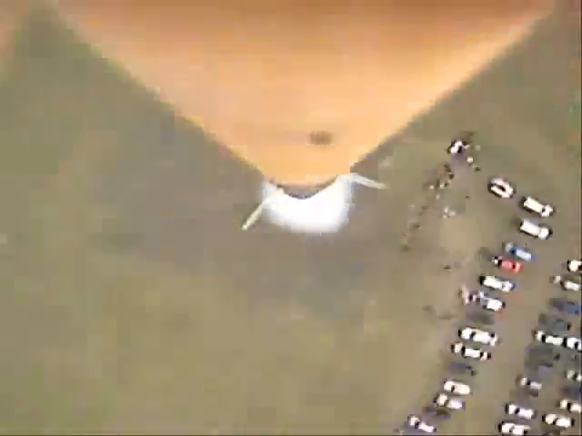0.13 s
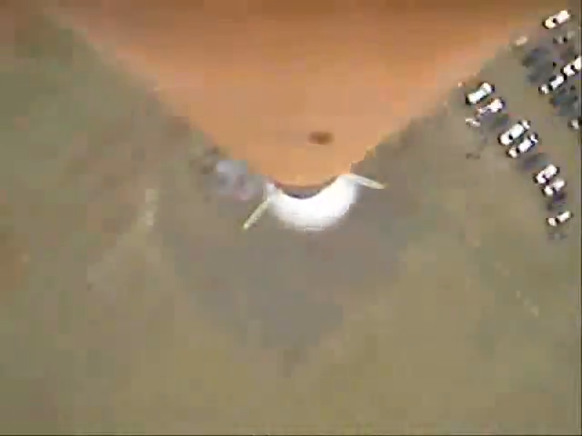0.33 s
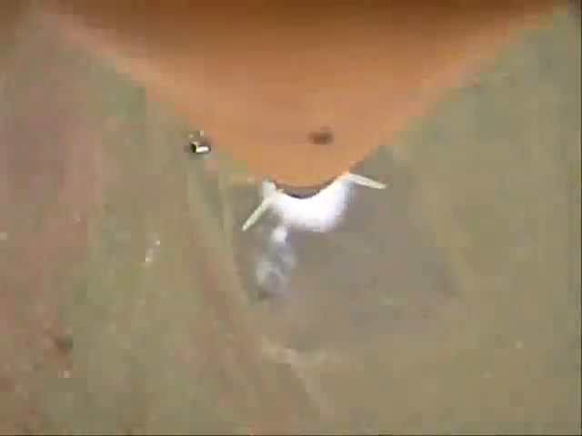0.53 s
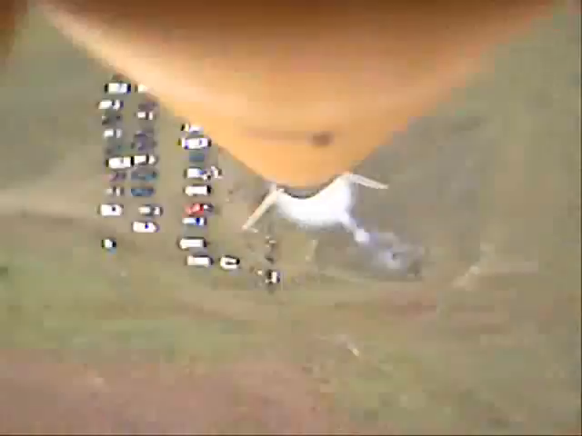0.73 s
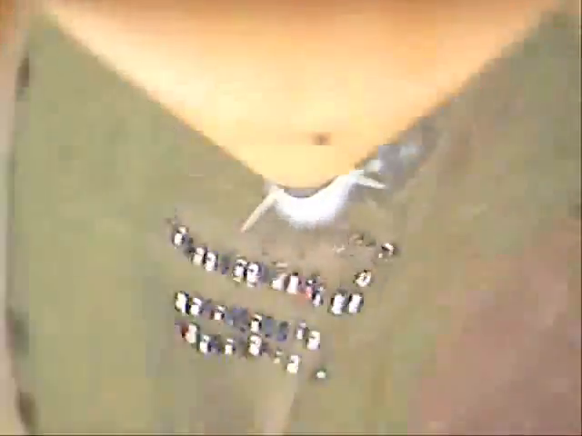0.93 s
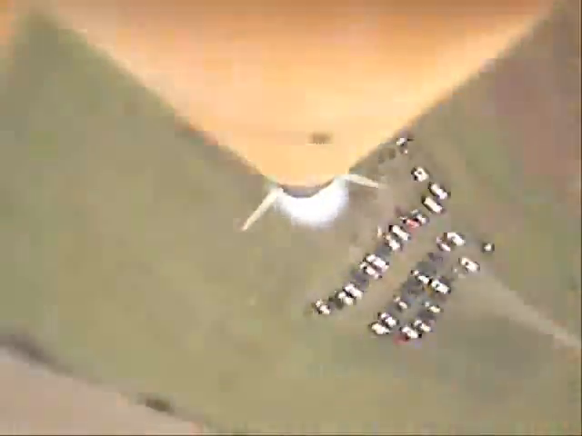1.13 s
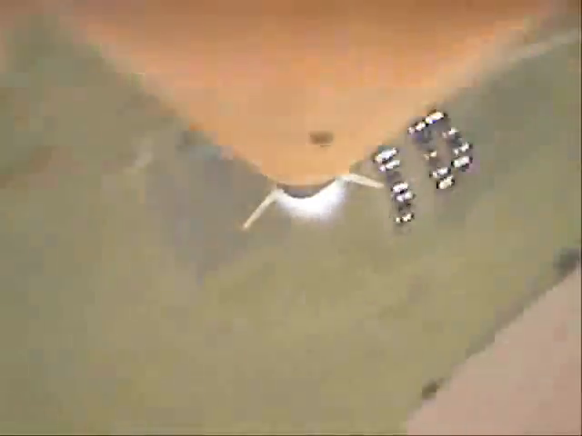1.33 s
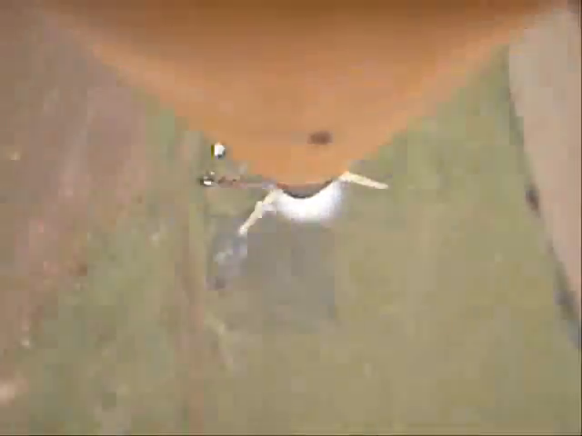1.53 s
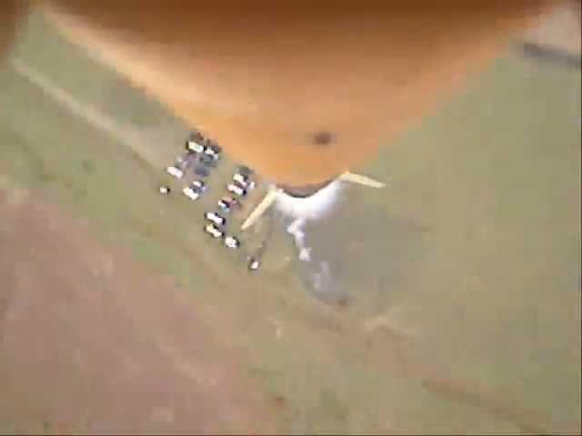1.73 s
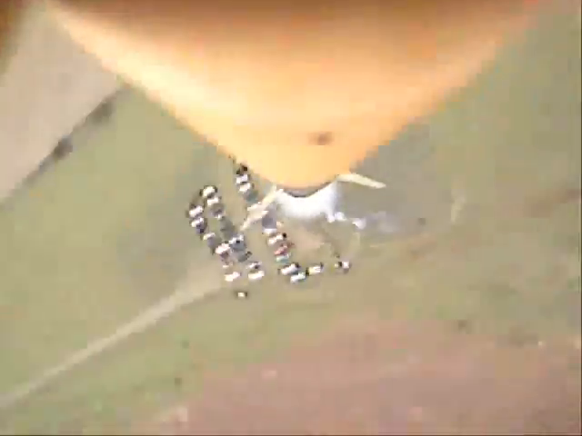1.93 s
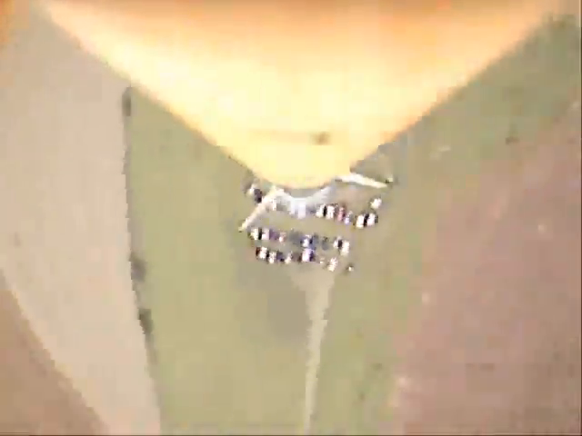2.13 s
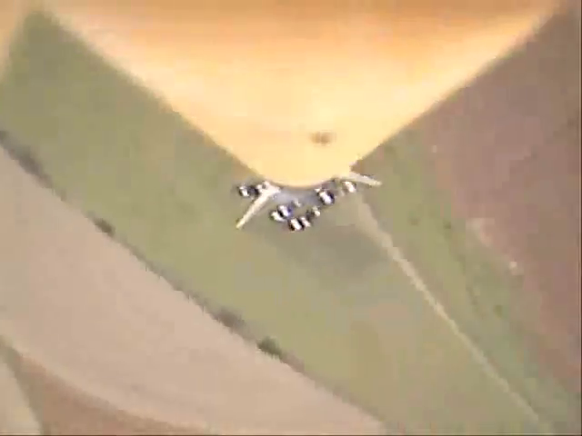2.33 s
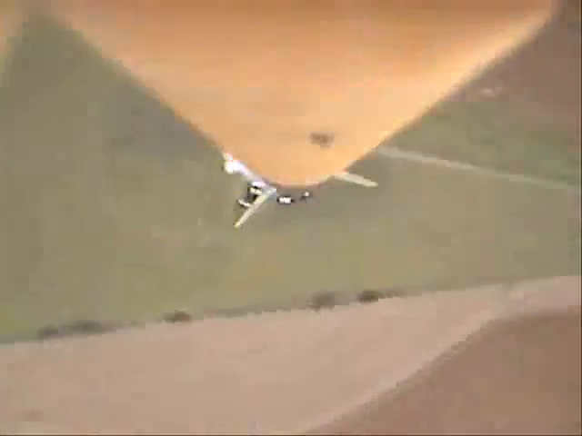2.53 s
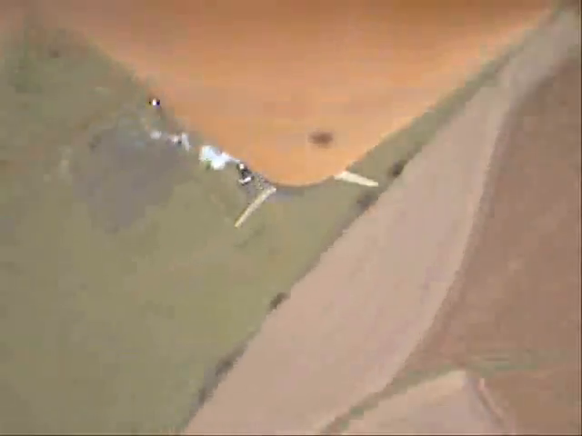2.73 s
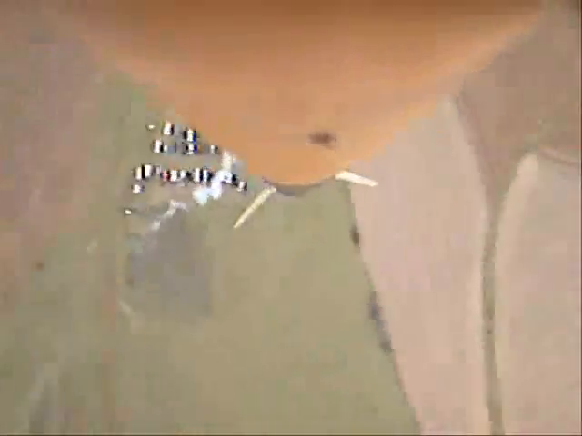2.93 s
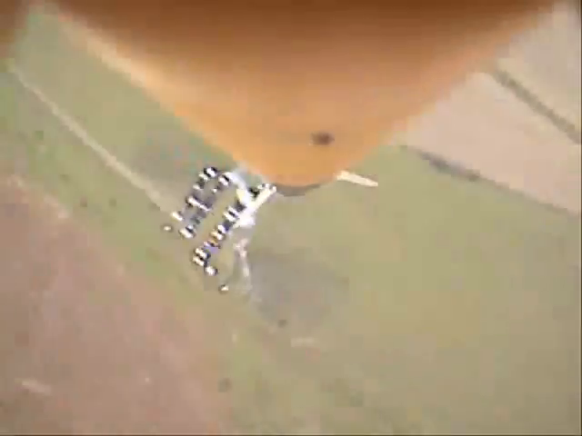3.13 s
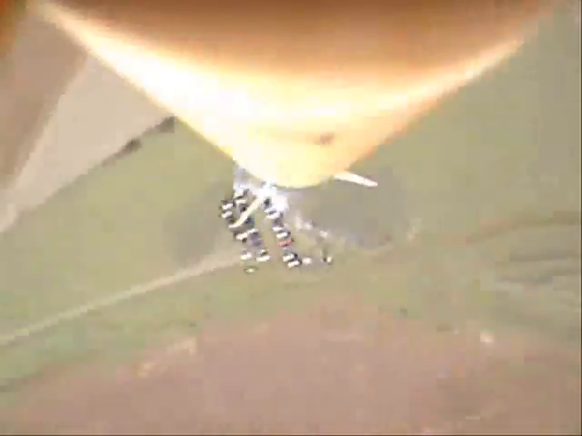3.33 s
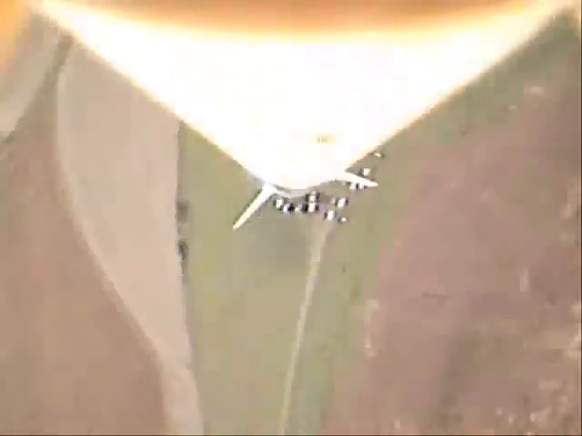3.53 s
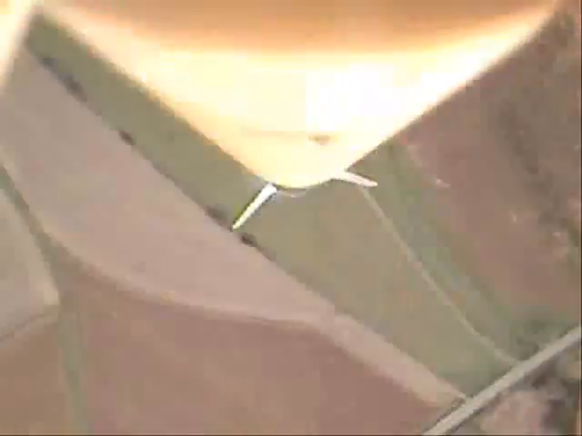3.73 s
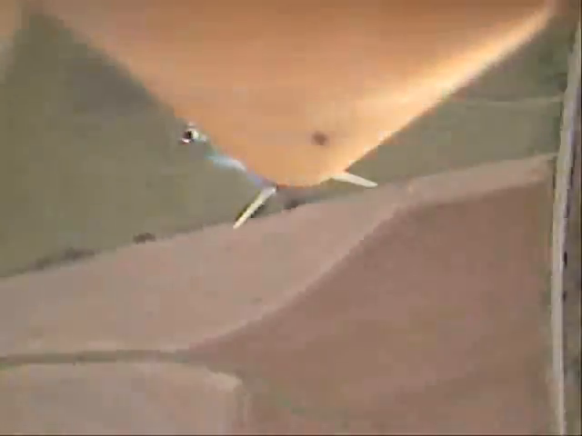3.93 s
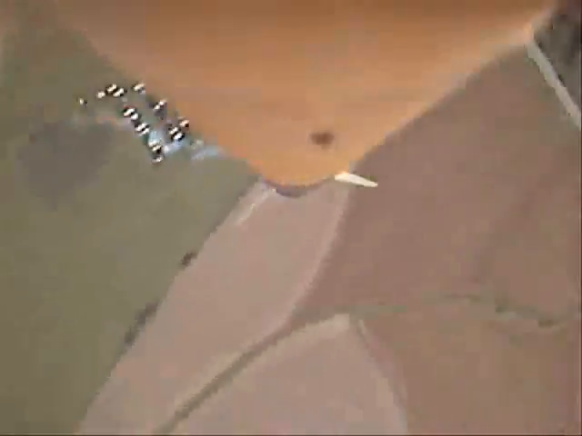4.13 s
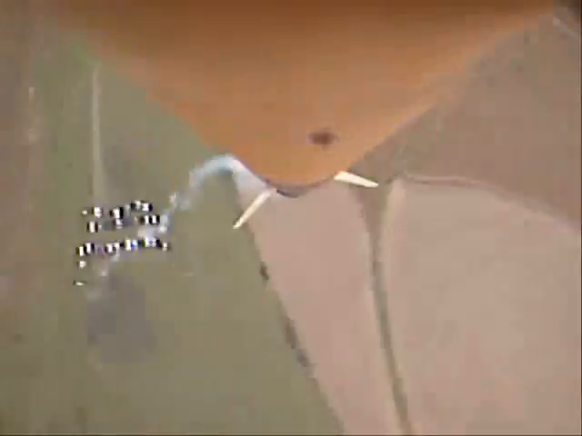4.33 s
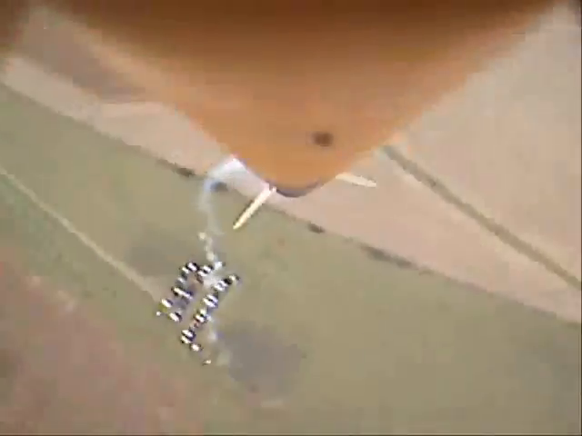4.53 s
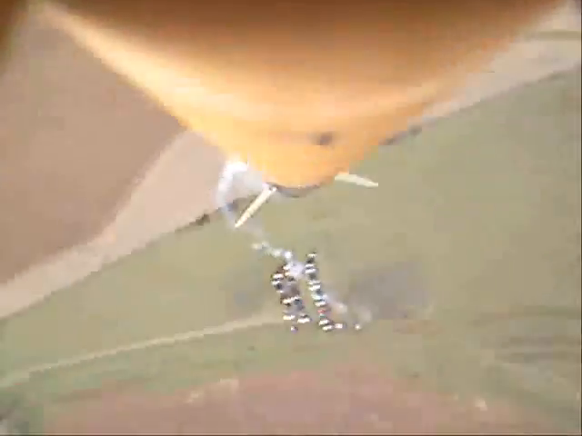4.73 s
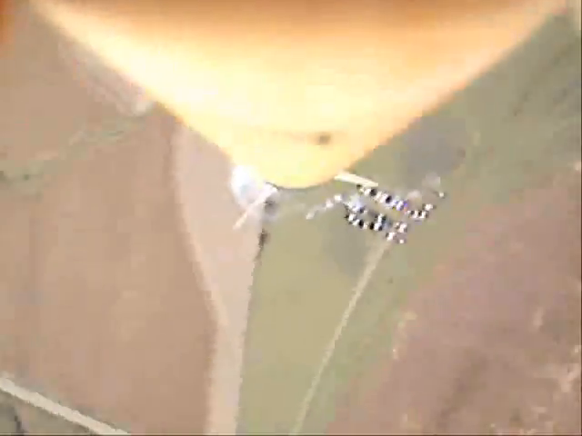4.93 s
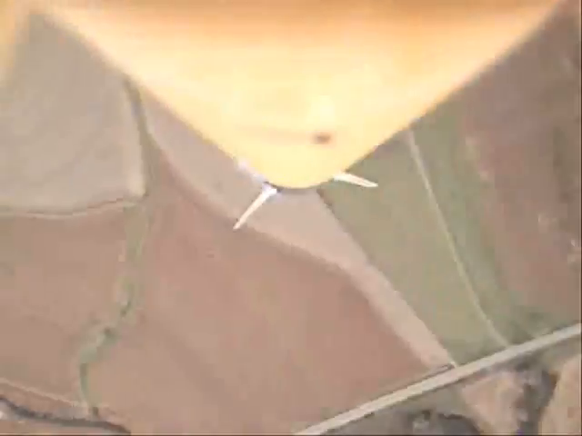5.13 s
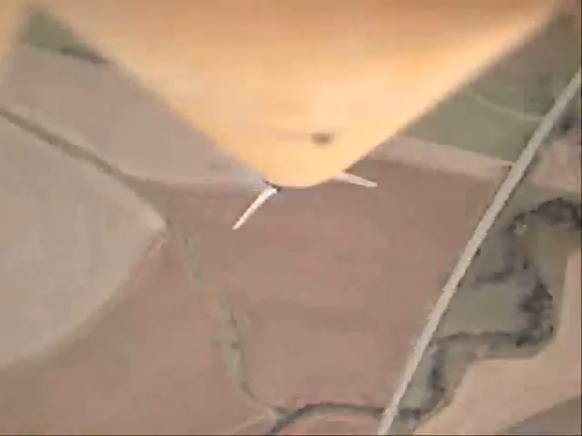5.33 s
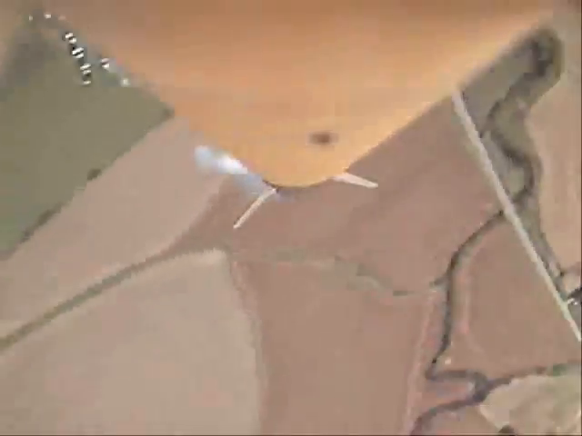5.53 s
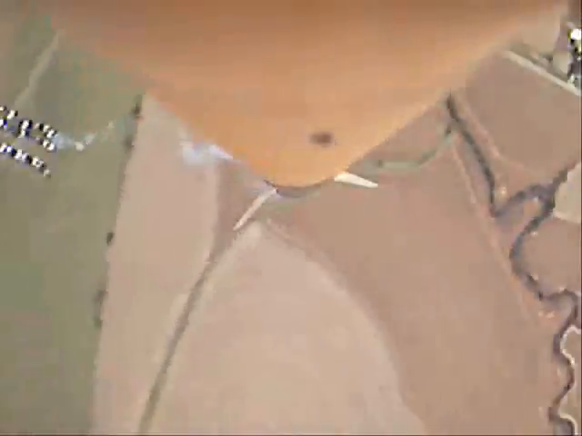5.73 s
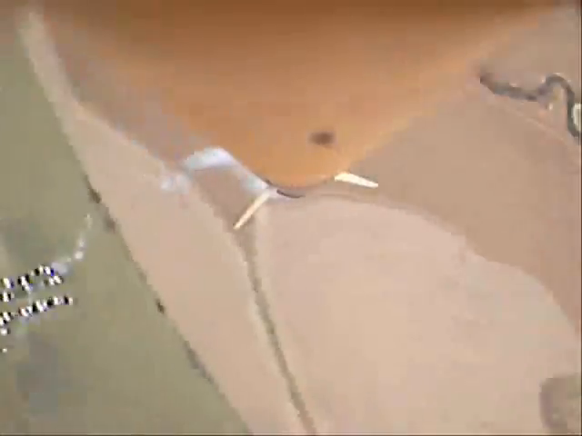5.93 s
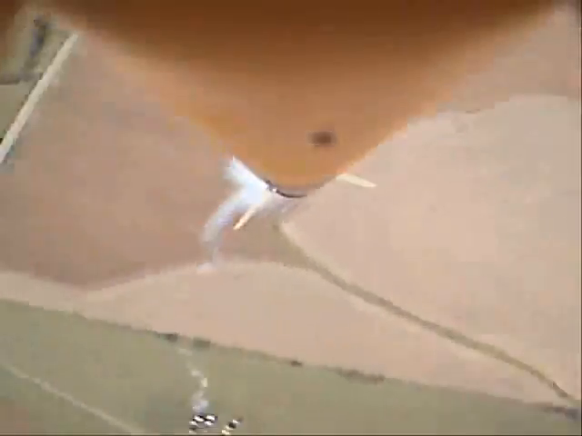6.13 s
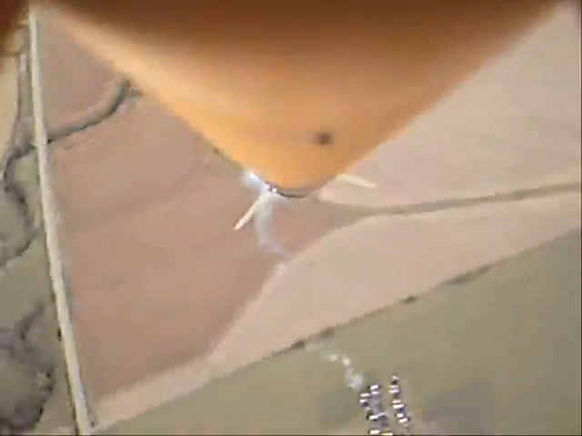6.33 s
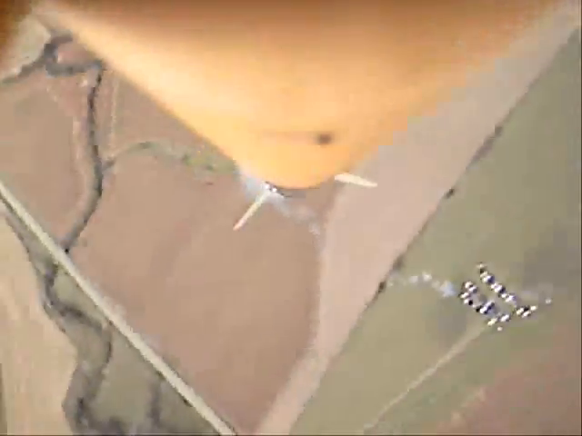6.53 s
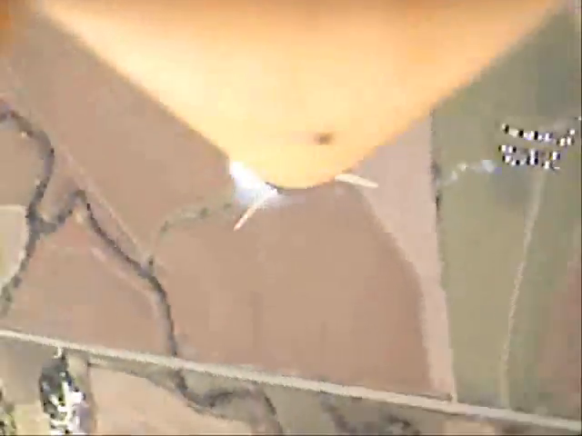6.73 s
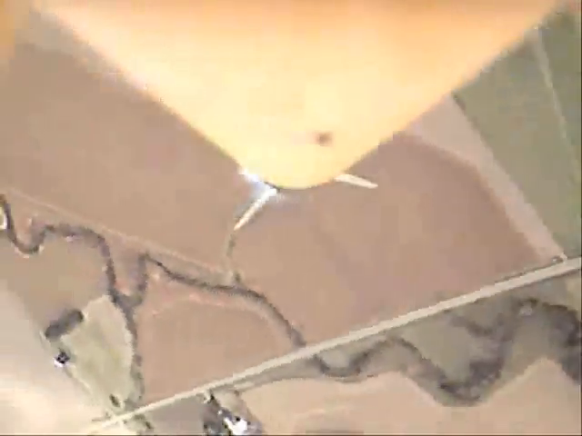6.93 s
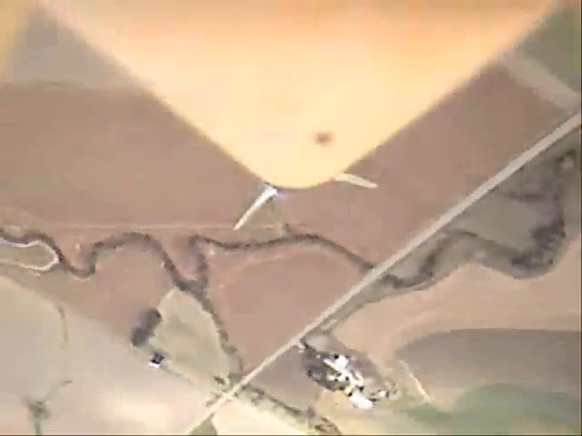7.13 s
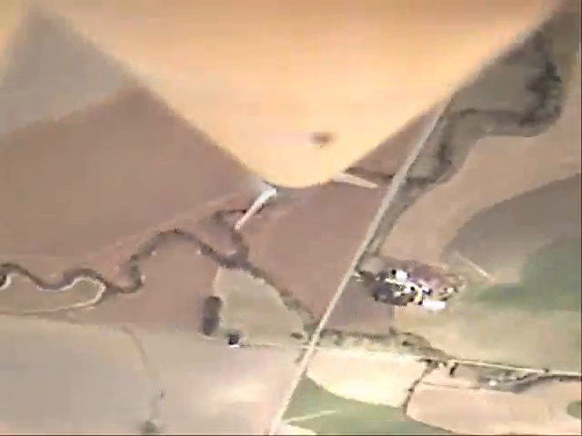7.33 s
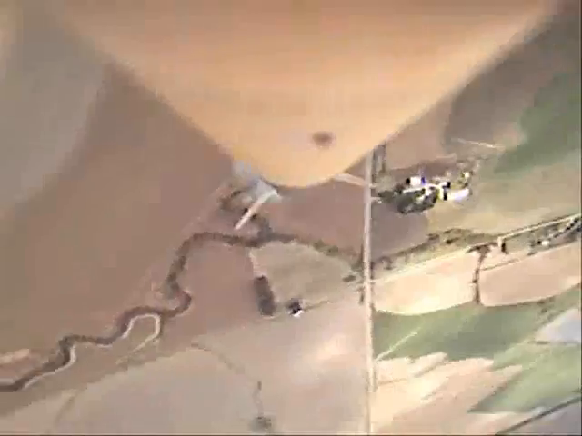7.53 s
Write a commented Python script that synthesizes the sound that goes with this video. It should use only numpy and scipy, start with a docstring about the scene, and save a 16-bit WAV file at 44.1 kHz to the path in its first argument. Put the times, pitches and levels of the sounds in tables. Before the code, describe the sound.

Harsh, distorted wind buffets a microphone on a climbing model rocket, its motor rumbling underneath before the rush gradually eases.

```python
"""Model rocket flight, heard on board

A small camera rides on the side of a model rocket: the motor roars for under three seconds, then the
rocket coasts upward. Turbulent air buffets the body, sets the tube and the camera housing resonating
and hisses through the microphone port, easing as the rocket slows. The wind overloads the microphone
on one side, which chops the hiss; a coarse 8 kHz recorder adds a gritty sheen."""
import sys
import numpy as np
from scipy import signal
from scipy.fft import rfft, irfft
from scipy.io import wavfile
from scipy.ndimage import uniform_filter1d

SR = 44100
rng = np.random.default_rng(int(sys.argv[2]) if len(sys.argv) > 2 else 0)


def file_out(sig):
    """Save sig as 16-bit WAV at sys.argv[1]."""
    # one column per channel
    cols = np.atleast_2d(sig).T
    # limit, then scale
    lim = np.clip(cols, -1, 1)
    pcm = np.round(lim * 32767).astype(np.int16)
    wavfile.write(sys.argv[1], SR, pcm)


N = 334719
TIME = np.arange(N) / SR
BINS = np.fft.rfftfreq(N, 1 / SR)

# spectrum of the buffeting around the body in the slow coast: f/Hz, relative level/dB
SLOW_BUFFET = [(7.1, -1), (12, 5), (64, 0), (87, 0), (118, -0.5), (133, -2.5), (156, -11), (201, -15),
               (232, -7.5), (250, -13.5), (290, -19), (321, -44), (400, -33), (520, -71), (880, -120)]
# brief dip in the housing's ring and the tube's overtones: t/s, duration/s, depth/dB
RESONANCE_DIP = [(6.94, 0.19, 5.5)]


def airflow(eddy_db=3, displacement=7, ram_db_per_db=0.21, suction_per_db=0.0025):
    """Turbulent pressure at the port: flow noise and the resonances it excites grow with airspeed."""
    # speeding up under thrust, slowing in the coast: t/s, airspeed/dB relative to the slow coast
    airspeed = [(0, 7.5), (0.28, 11), (0.5, 12), (1.05, 13.5), (2.2, 11.5), (3.0, 12.5), (3.7, 8), (4.4, 6),
                (5.2, 2.5), (6.2, 2.5), (6.9, -0.6), (7.59, -1.4)]
    speed_db = np.maximum(curve(airspeed), 0)
    gust_db = gusts(speed_db)
    push = eddies()
    rumble = buffeting(speed_db, gust_db) + tube_hoot(speed_db)
    # a large eddy displaces the ordinary rumble while it passes
    rumble /= 1 + displacement * uniform_filter1d(abs(push), SR // 50)
    ring_and_hiss = puffs(rumble, push) * (housing_ring(speed_db, gust_db) + port_hiss(speed_db, gust_db))
    turbulence = rumble + tube_overtones(gust_db) + amp(eddy_db) * push + ring_and_hiss
    # ram pressure drives every layer harder; flow across the port draws a steady suction
    return amp(ram_db_per_db * speed_db) * turbulence - suction_per_db * speed_db


def buffeting(speed_db, gust_db, base_db=-12.5, fast_from_db=4, fast_span_db=5):
    """Turbulence around the body makes low noise whose spectrum broadens with speed."""
    # spectrum at full speed: f/Hz, relative level/dB
    fast_buffet = [(8.2, -39), (14, -2.5), (38, 0.5), (113, 0), (131, -3.5), (166, -8), (219, -6.5),
                   (285, -20), (330, -24), (430, -36), (730, -120)]
    fast = np.clip((speed_db - fast_from_db) / fast_span_db, 0, 1)
    churn = np.sqrt(fast) * noise(fast_buffet) + np.sqrt(1 - fast) * noise(SLOW_BUFFET)
    level_db = base_db + 0.45 * speed_db + 0.6 * np.minimum(gust_db, 5)
    return amp(level_db) * steady(churn, span_s=0.18)


def eddies(small_per_s=5, small_db=-9.5, spread_db=4, lag_s=0.0021, lead_s=0.0055, suction=0.52):
    """A passing vortex is a pressure doublet: a trough of suction, then a core of pressure."""
    # the strongest eddies that slap the port: t/s, relative level/dB
    large_eddies = [(0.029, -8), (0.077, -2), (0.209, 1.5), (0.803, -1.5), (0.834, -1.5), (0.919, -1.5),
                    (1.247, -9.5), (1.385, -3), (2.752, -7), (3.311, 4.5), (3.465, -2), (3.665, -2),
                    (3.984, -3.5), (4.388, 0), (4.67, -17), (4.769, -13), (5.456, -4.5), (6.247, 0),
                    (6.635, -2), (6.793, 0.5)]
    arrivals = rng.random(N) < small_per_s / SR
    cores = arrivals * amp(small_db + spread_db * rng.uniform(-1.36, 1, N))
    for t, db in large_eddies:
        cores[int(t * SR)] += amp(db)
    doublet = np.exp(-2j * np.pi * BINS * lag_s) - suction * np.exp(2j * np.pi * BINS * lead_s)
    shape = colour(SLOW_BUFFET)
    return irfft(rfft(cores) * doublet * shape, N) / irfft(shape, N)[0]


def gusts(speed_db, waver_db=2.5, calm_speed_db=9):
    """Unsteady flow shifts the level, in dB: gusts, lulls and a wavering that grows as speed falls."""
    # gusts that hit the camera as the rocket rolls: t/s, duration/s, rise/dB
    blasts = [(0.031, 0.031, 9), (0.155, 0.036, 5), (1.248, 0.026, 3.5), (2.29, 0.083, 3),
              (2.66, 0.027, 5.5), (3.992, 0.032, 5.5), (4.075, 0.022, 3.5), (4.6, 0.044, 3),
              (4.745, 0.033, 4.5), (5.455, .04, 7), (5.75, 0.031, 4.5), (5.89, 0.04, 0.5), (6.14, 0.015, 3),
              (6.21, 0.086, 3.5), (6.637, 0.026, 4.5), (6.797, 0.013, 7.5), (7.064, 0.039, 6.5),
              (7.24, .08, 4), (7.557, 0.012, 13)]
    # moments of smooth flow: t/s, duration/s, depth/dB
    lulls = [(0.3, 0.075, 4.5), (2.72, 0.032, 4.5), (3.868, 0.024, 2), (4.023, 0.023, 17),
             (5.034, 0.032, 14), (5.175, 0.013, 18), (5.3, 0.097, 3.5), (5.927, .04, 8), (6.022, 0.023, 13),
             (6.273, 0.028, 10), (6.603, 0.016, 3), (7.023, 0.061, 10)]
    wavering = waver_db * np.exp(-speed_db / calm_speed_db) * flutter(rate_hz=13)
    return swells(blasts) - swells(lulls) + wavering


def tube_hoot(speed_db, base_db=-22):
    """Air-column resonance: wind blowing over the body tube sounds it near 120 Hz."""
    # lowest resonance of the tube: f/Hz, relative level/dB
    resonance = [(80, -3.5), (102, -3), (120, 6.5), (136, -3), (158, -30)]
    # the wind catches the tube: t/s, duration/s, rise/dB
    hoots = [(1.0, .25, 5.5), (2.05, 0.42, 8), (3.1, 0.47, 8.5), (7.0, 0.3, 9.5)]
    return amp(base_db + 0.19 * speed_db + swells(hoots)) * steady(noise(resonance), span_s=0.16)


def tube_overtones(gust_db):
    """Higher modes of the air column pass narrow bands of noise, swelling with each gust."""
    # upper resonances of the tube: f/Hz, half-width at 15 dB down/Hz, level/dB
    modes = [(237.4, 47, -28.5), (478, 58, -34)]
    bands = sum(amp(db) * noise([(hz - width, -15), (hz, 0), (hz + width, -15)])
                for hz, width, db in modes)
    return amp(gust_db - swells(RESONANCE_DIP)) * bands


def housing_ring(speed_db, gust_db, base_db=-33.5):
    """Forced resonance: the flow excites the camera housing, which rings hollowly near 500 Hz."""
    # response of the housing: f/Hz, relative level/dB
    housing = [(210, -40), (350, -15.5), (394, -4.5), (482, 0), (517, 0), (543, 4), (628, -6), (719, -10.5),
               (888, -20.5), (1000, -26.5), (1300, -61), (2200, -120)]
    level_db = base_db + 0.73 * speed_db + 1.05 * gust_db - swells(RESONANCE_DIP)
    return amp(level_db) * steady(noise(housing), span_s=0.033)


def port_hiss(speed_db, gust_db, base_db=-42):
    """Broadband flow noise is coloured by the resonance of the microphone port."""
    # spectrum of the hiss: f/Hz, relative level/dB
    port = [(530, -49), (900, -10.5), (1030, -9), (1150, -11.5), (1370, -10), (1760, 2), (2040, -3.5),
            (2430, -24), (2680, -17), (3200, -20), (3900, -22), (5070, -69), (8580, -120)]
    return amp(base_db + speed_db + 0.52 * gust_db) * noise(port)


def puffs(rumble, push, flutter_db=2.1, surge_db=2, stir_db=6, full_stir=0.31):
    """Amplitude modulation by the flow: a gain that peaks on inward pushes of air and in eddy cores."""
    flicker = flutter_db * flutter(rate_hz=106)
    surge = surge_db * np.tanh(steady(rumble, span_s=0.17))
    return unit(amp(flicker + surge)) * amp(stir_db * np.tanh(push / full_stir))


def motor(sputter_db=3):
    """Jet noise: the exhaust roars and sputters, dying away as the propellant is spent."""
    # roar following the thrust: t/s, level/dB
    thrust = [(0, -23.5), (.4, -17), (1.3, -14.5), (2.3, -11), (2.8, -26), (3.2, -42)]
    # spectrum of the exhaust: f/Hz, relative level/dB
    exhaust = [(40, 4.5), (90, 4), (200, 0), (330, -11.5), (500, -29), (900, -31), (1800, -24.5),
               (3900, -42)]
    return amp(curve(thrust)) * noise(exhaust) * unit(amp(sputter_db * flutter(rate_hz=120)))


def microphone(pressure, bottom=0.39, top=1.3, knee=3.04, leak=0.074, coupling_hz=36):
    """Asymmetric saturation: the capsule bottoms out under suction, muffling the hiss."""
    limit = np.where(pressure < 0, bottom, top)
    squashed = pressure / (1 + abs(pressure / limit) ** knee) ** (1 / knee)
    # the coupling capacitor lets each flat stretch sag back to zero
    coupling = signal.butter(1, coupling_hz, "high", fs=SR)
    return signal.lfilter(*coupling, (1 - leak) * squashed + leak * pressure)


def rasp(voltage, level_db=-33, full_swing=0.65, sharpness=1.55):
    """Modulation noise: large swings of either sign carry a gritty buzz, heard as dry crackle."""
    # spectrum of the crackle: f/Hz, relative level/dB
    crackle = [(1000, 1.5), (2250, 5), (2550, -6), (2720, 4.5), (2950, -11), (3250, -5), (3900, -8)]
    swing = np.tanh(abs(voltage / full_swing) ** sharpness)
    return amp(level_db) * swing * steady(noise(crackle), span_s=0.002)


def ticks(voltage, level_db=-35, trigger=0.46, tick_hz=2700, decay_s=0.0012):
    """Threshold triggering: each inward swing past the trigger starts a tiny damped sinusoid."""
    above = uniform_filter1d(voltage, SR // 1000) > trigger
    starts = np.diff(above.astype(float), prepend=0) > 0
    t = TIME[:SR // 100]
    tick = np.exp(-t / decay_s) * np.sin(2 * np.pi * tick_hz * t)
    return amp(level_db) * signal.oaconvolve(starts.astype(float), tick)[:N]


def amp(db):
    """Amplitude ratio for a level in decibels."""
    return 10 ** (np.asarray(db) / 20)


def unit(x):
    """Normalisation to rms 1."""
    return x / np.sqrt(np.mean(x ** 2) + 1e-20)


def curve(rows):
    """Linear interpolation in time through rows of t/s, level/dB."""
    return np.interp(TIME, *np.transpose(rows))


def swells(rows):
    """Sum of Gaussian bumps in dB, one for each row of t/s, duration/s, height/dB."""
    return sum(db * np.exp(-(2 * (TIME - t) / duration) ** 2) for t, duration, db in rows)


def colour(points, skirt_db_per_octave=40):
    """Magnitude response through points of f/Hz, level/dB, rolling off past both ends."""
    hz, db = np.transpose(points)
    octave, known = np.log2(BINS + 1), np.log2(hz + 1)
    outside = abs(octave - np.clip(octave, known[0], known[-1]))
    return amp(np.interp(octave, known, db) - skirt_db_per_octave * outside)


def noise(points):
    """White noise filtered to the given spectrum, at rms 1."""
    return unit(irfft(rfft(rng.standard_normal(N)) * colour(points), N))


def flutter(rate_hz):
    """Low-pass noise of rms 1: a random wavering up to about rate_hz."""
    return unit(irfft(rfft(rng.standard_normal(N)) / (1 + (BINS / rate_hz) ** 2), N))


def steady(x, span_s):
    """Division by the running rms evens out swells slower than span_s."""
    size = max(int(span_s * SR), 1)
    return x / np.sqrt(uniform_filter1d(uniform_filter1d(x ** 2, size), size) + 1e-9)


def scene():
    """Superposition: the pressures of airflow and motor add at the one microphone port."""
    return (airflow() + motor())[None]


def record(dry, gain_db=1, recorder_hz=8000, edge_hz=15600):
    """Zero-order hold: the overloaded, clipped signal is held in steps, imaged around 8 and 16 kHz."""
    voltage = amp(gain_db) * microphone(dry[0])
    gritty = voltage + rasp(voltage) + ticks(voltage)
    sampled_at = np.floor(TIME * recorder_hz) / recorder_hz
    steps = np.clip(np.interp(sampled_at, TIME, gritty), -1, 1)
    band_limit = signal.firwin(401, edge_hz, window=("kaiser", 8), fs=SR)
    return signal.oaconvolve(steps, band_limit, "same")[None]


dry = scene()
out = record(dry)
file_out(out)
```